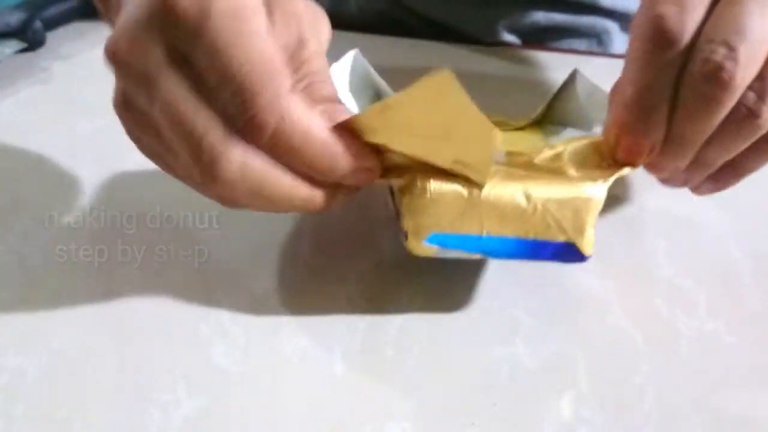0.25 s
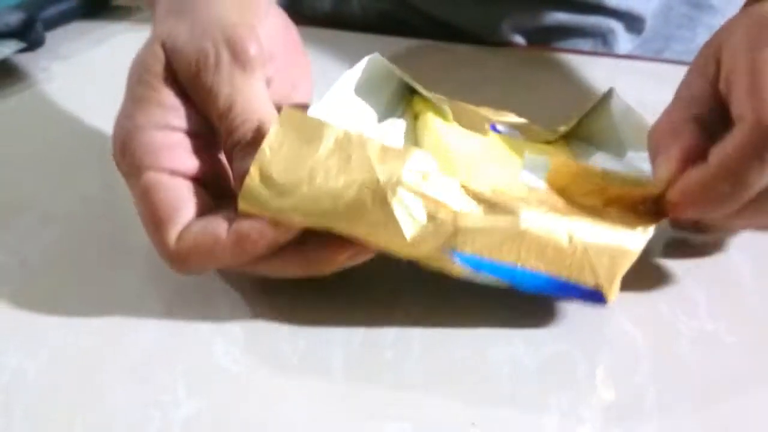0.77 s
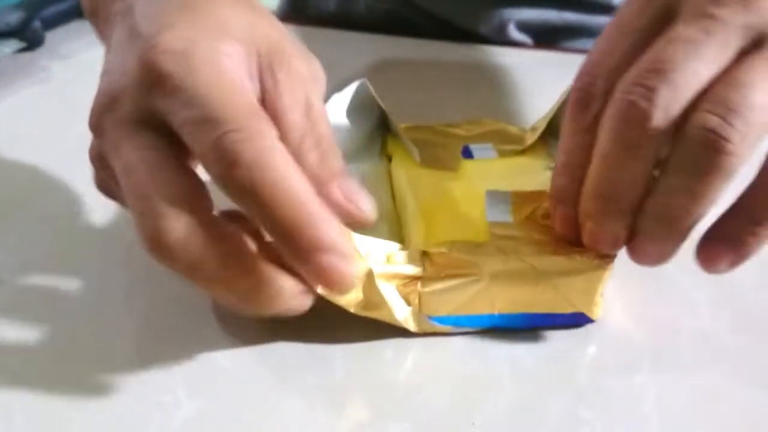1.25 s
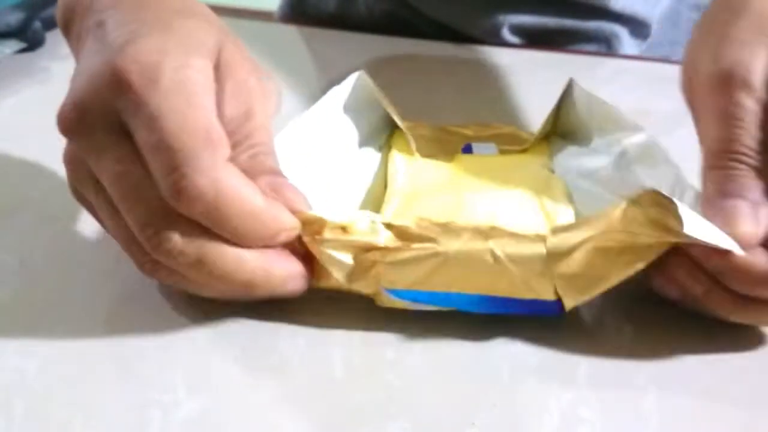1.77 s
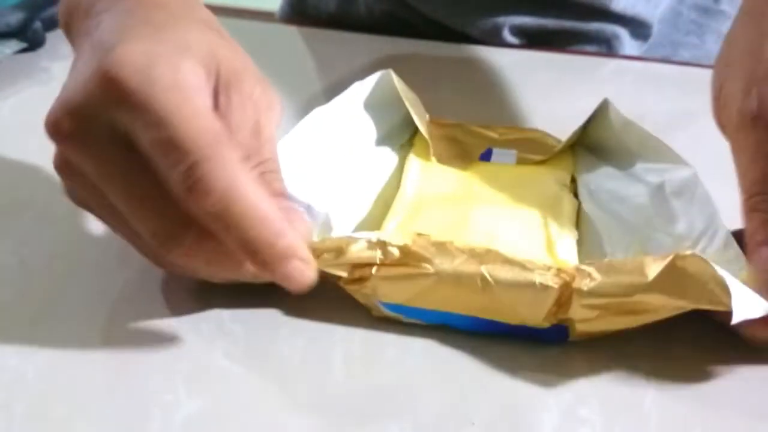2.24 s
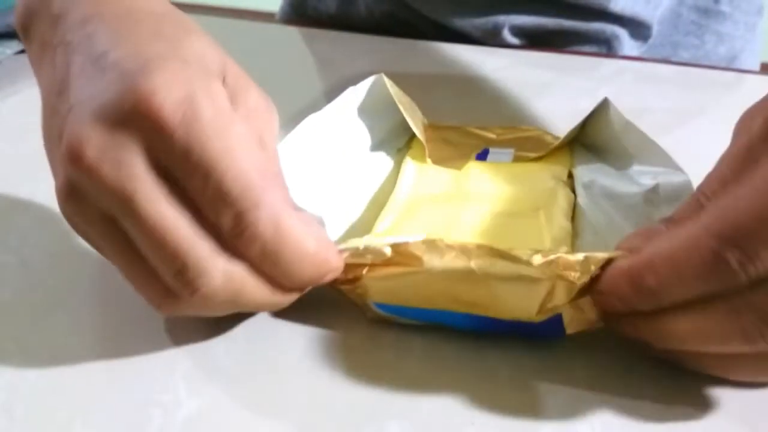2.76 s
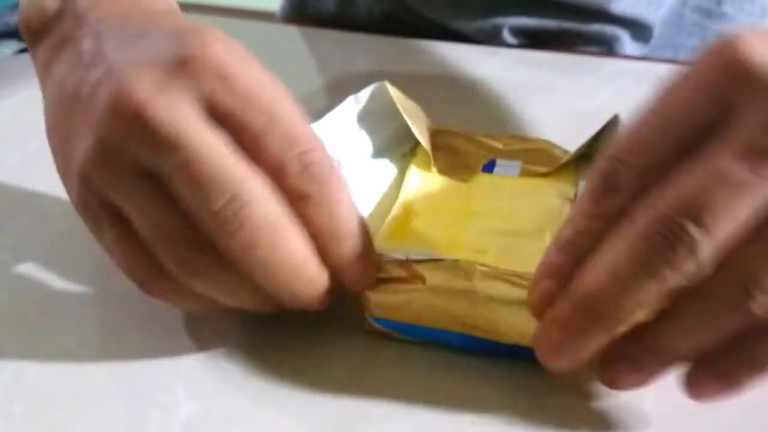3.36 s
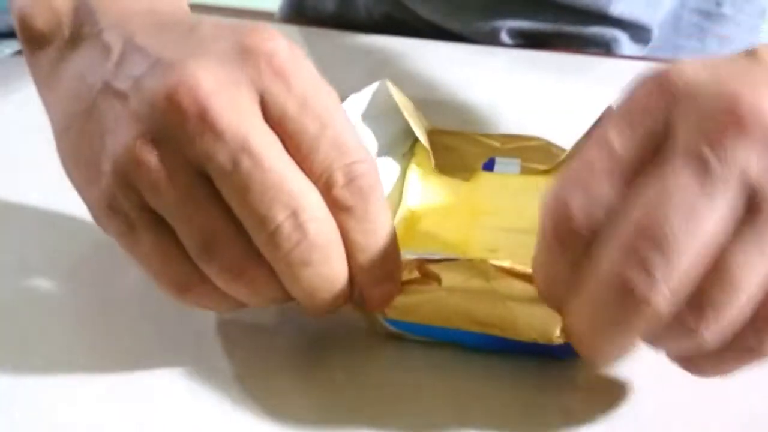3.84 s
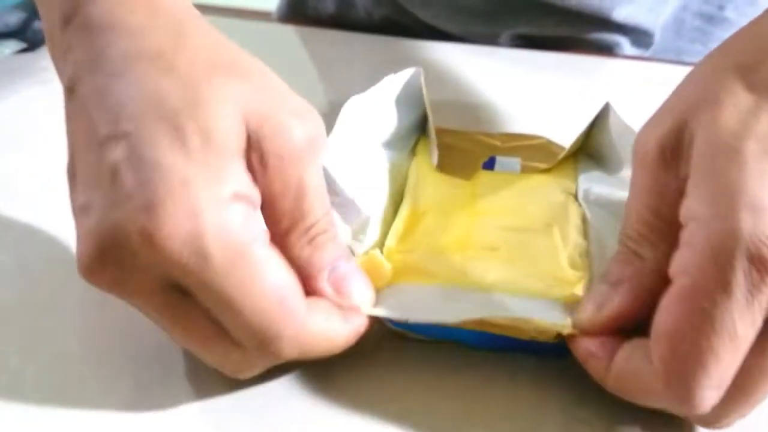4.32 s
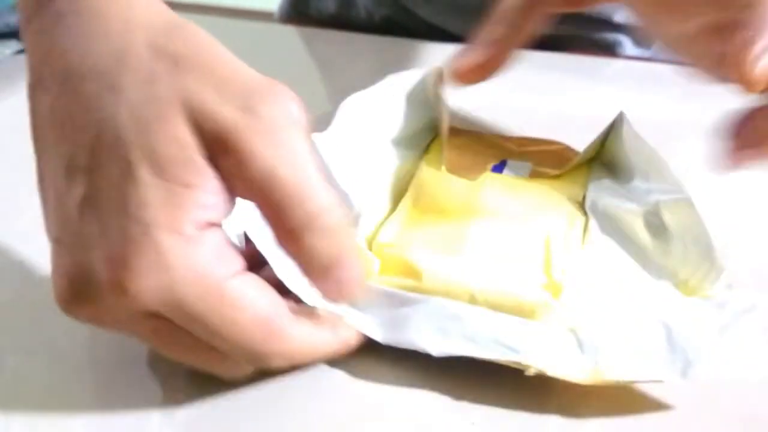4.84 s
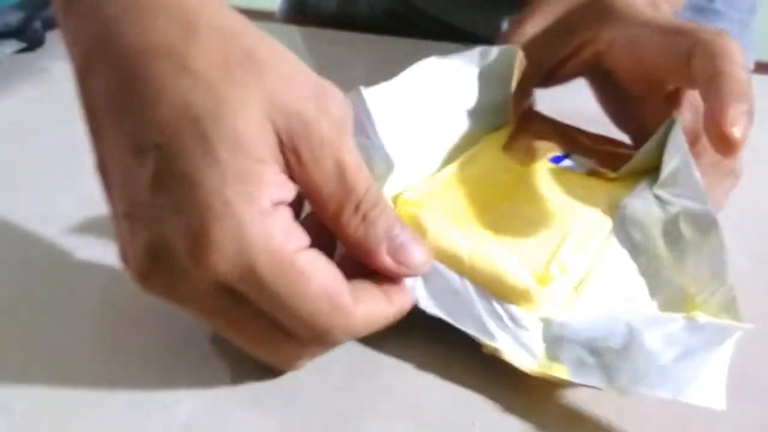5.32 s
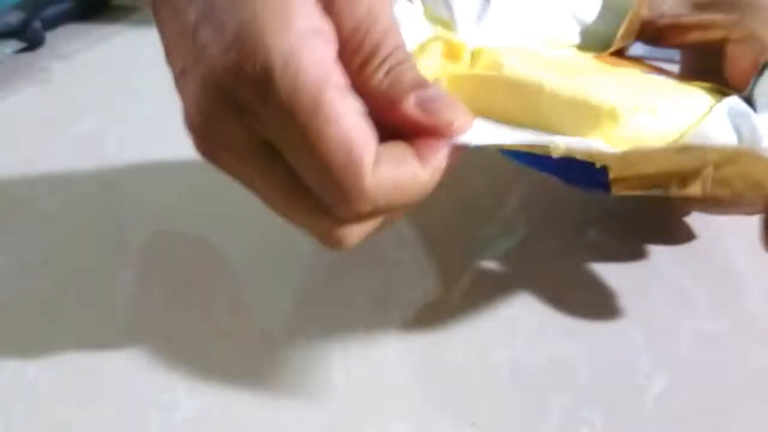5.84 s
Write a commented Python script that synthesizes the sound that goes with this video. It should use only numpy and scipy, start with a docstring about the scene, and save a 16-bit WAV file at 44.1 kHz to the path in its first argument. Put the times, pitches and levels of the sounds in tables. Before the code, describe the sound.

Crisp foil paper crinkles and snaps unevenly as fingers open it, with soft low thuds on the worktop and busier rustling at the end.

```python
"""On a kitchen worktop, close to a phone, fingers unfold a foil-lined paper wrapper round a soft block.
A fine rustle is made of thousands of tiny random creases; larger creases snap as bursts of jolts that
ring the sheet, the loudest, near 1.59 s, built of two overlapping bursts. The hard-walled kitchen echoes
the wrapper through decaying bands of noise. Block and hands thud on the worktop, which booms as a bank of
damped sines. Underneath lie a wavering rumble, a faint filtered hiss and a distant engine of sine orders."""
import sys
import numpy as np
from scipy import signal
from scipy.fft import rfft, irfft, next_fast_len
from scipy.io import wavfile
from scipy.ndimage import uniform_filter1d

SR = 44100
rng = np.random.default_rng(int(sys.argv[2]) if len(sys.argv) > 2 else 0)


def digitize_waveform(pressure):
    """Quantize a signal to 16-bit integers and store it at the path in sys.argv[1].

    Rows of a 2-D input are taken as channels; values are limited to [-1, 1].
    """
    field = np.atleast_2d(pressure).T
    bounded = np.clip(field, -1, 1)
    quanta = np.round(bounded * 32767).astype(np.int16)
    wavfile.write(sys.argv[1], SR, quanta)


N = 268569
T = np.arange(N) / SR

# The sheet never quite rests. Each row: time in seconds, level in dB before the rustle trim.
RESTING_RUSTLE = [(0, -48.5), (.35, -52), (.65, -46), (.9, -56.5), (1.45, -45.5), (2.0, -56), (2.35, -57.5),
                  (2.56, -68), (2.68, -59.5), (3.05, -64), (3.2, -71), (3.6, -55), (4.9, -61), (5.4, -57.5),
                  (6.09, -54.5)]
# Swells of the rustle, from a pull on the sheet or, at 1.615 s, the ringing tail of the big snap.
# Each row: peak time in seconds, level in dB before the rustle trim, rise in ms, fall in ms,
# dull share in dB, its tilt in dB per octave, airy share in dB.
SWELLS = [(.405, -45, 14, 31, 7.5, -6, -14), (.686, -63, 8, 20, -8, 3, -25),
          (1.01, -51.5, 7.9, 45, -3, -7, -5), (1.075, -45.5, 65, 34, -6, -7.5, -3),
          (1.199, -58, 19, 22, 8, -8, -3), (1.615, -52, 28, 110, 5.5, 22, -10),
          (1.88, -48.5, 23, 120, -1, -5.5, -22), (2.25, -48, 4.9, 36, -10, -12, -10),
          (2.459, -51, 53, 32, -3, -2, -5), (2.758, -54, 11.6, 37, -18, 6, -22),
          (2.905, -60, 14, 85, -8, -6, -8), (3.369, -50, 8.8, 58, -0.5, -1.5, -11),
          (3.608, -50.5, 32, 12, 6.5, 8, -17), (4.263, -47.5, 64, 18, -1.5, 2, -6),
          (4.549, -43.5, 28, 16, -12.5, 21, -15), (4.701, -44.5, 80, 32, -6.5, 2, -13),
          (4.86, -51, 7.2, 51, -3, 2, -8), (4.961, -36.5, 1.9, 15, 4.5, -7, -25),
          (4.983, -22.5, 7.9, 3.5, -29, 6, -41), (5.195, -39.5, 7.8, 31, -15.5, -10, -14),
          (5.279, -39, 23, 29, -14, -2, -14), (5.36, -46.5, 24, 20, -16, 8, -12),
          (5.471, -42.5, 8.1, 17, -27, 4, -15), (5.585, -46.5, 19, 18, -1.5, 11, -8),
          (5.688, -44, 15, 17, -17, 4, -13), (5.981, -42, 43, 48, 0.5, -0.5, -12),
          (6.07, -46, 48, 65, -5, 0, -10)]
# Crisp resonances of the foil. Each row: centre in Hz, width in Hz (widened for the rustle), level in dB.
FOIL = [(3170, 630, -1), (4334, 620, 3.5), (5546, 680, 7.5), (6320, 2540, -4)]
# Broad facets that give the duller part. Each row: centre in Hz, width in Hz before widening, level in dB.
FACETS = [(1033, 690, -4), (1800, 1700, -7.5), (2640, 800, 2.5), (3360, 1300, -8)]
DULL_SHARE_DB, AIR_SHARE_DB = -1.5, -11.5  # duller part and airy top of the resting rustle
RUSTLE_TRIM_DB = -5.5

# Low rumble. Each row: time in seconds, level in dB.
RUMBLE = [(0, -60), (1.3, -60), (1.8, -64), (2.5, -62), (2.9, -67), (5.35, -66), (5.6, -70), (6.09, -70)]
# Colour of the hiss. Each row: frequency in Hz, relative level in dB per Hz.
HISS_COLOUR = [(59, -41), (100, 5.5), (251, -26), (324, -8.5), (564, -17), (761, -10.5), (884, -14),
               (1330, -13), (2460, -10.5), (5430, -16), (9070, -24.5), (14800, -24.5), (16500, -48)]
HISS_DB = -61

# A distant engine drones past. Each row: time in seconds, cycle rate in Hz, level in dB before its trim.
ENGINE = [(0, 27.85, -83), (0.597, 35.3, -63.5), (1.65, 39.77, -62.5), (1.85, 39.04, -76),
          (3.199, 31.94, -72), (3.502, 35.33, -68), (4.102, 41.09, -68), (4.5, 41.73, -68),
          (4.801, 40, -67.5), (4.999, 39.7, -82), (6.09, 37, -94)]
# Engine orders. Each row: multiple of the cycle rate, level in dB.
ENGINE_ORDERS = [(2, 0), (3, -13), (4, -10), (5, -8), (10, -14)]
ENGINE_TRIM_DB = 5

# Creases that snap; 0.018 s and 1.594 s are early reflections of the snap just before, and 1.5896 s
# and 1.5909 s together make the loudest snap. Each row: time in seconds, crisp peak in dB before the
# snap trim, panel peak in dB over the crisp one, panel pitch in Hz, fine edge peak in dB over the
# crisp one, crumple time in ms (shortened by CRUMPLE_OFFSET_MS).
SNAPS = [(0.0117, -10.5, -16, 1590, -20, 1.07), (0.018, -24, 0.5, 2090, -6.5, 2),
         (0.0421, -31.5, -5, 1920, -8.5, 2.5), (.245, -40, -1, 2020, -21, 3),
         (0.3605, -33.5, -28, 2440, -6, 1.9), (0.3697, -35, 1.5, 930, 0.5, 1.9),
         (0.383, -53, 14, 1300, -8, 3.1), (0.3969, -22, -2.5, 1350, -26, 1.55),
         (0.5, -33.5, -30, 1410, -9, 0.74), (0.5649, -24, -30, 2550, -10, 0.55),
         (0.591, -30, -13, 4000, -23, 1.8), (.619, -37, -22, 2500, 1, 1.4),
         (0.6261, -31, -4, 2570, -28, 1.8), (0.684, -34, -4, 2720, -15, 6.6),
         (0.7218, -35.5, -15, 1360, -18, 1), (0.776, -46, 3, 2830, -17, 1.4),
         (1.058, -43, -2, 1110, -32, 2.8), (1.342, -38, -10, 2300, -2, 3.5),
         (1.4327, -52, -6, 2378, 15.5, 5.5), (1.5596, -39, 16.5, 1950, -12, 0.65),
         (1.5716, -37, 6, 1180, -16, 1.2), (1.5774, -18.5, -0.5, 2220, -37, 1.4),
         (1.585, -19.5, 1.5, 2090, -34, 1.4), (1.5896, -5, -0.5, 2320, -18, 0.92),
         (1.5909, -23.5, 12.5, 3700, -26, 2.3), (1.594, -23, -1, 2420, -15, 1.2),
         (1.606, -28, 9, 3100, -15, 1.4), (1.643, -42, -4, 3300, -20, 1.2),
         (1.6802, -36, 11.5, 1450, -15, 1.4), (1.7486, -29.5, 12, 1930, -36, .6),
         (1.752, -18, -6, 1830, 0, 0.96), (1.81, -30.5, -17, 2014, -24, 0.85),
         (1.87, -25, -7.5, 2200, -8, 3.5), (1.965, -32.5, -24, 2390, -6, 3.7),
         (2.0246, -41, -2, 2600, -19, 0.78), (2.043, -45, -3, 597, 3, 2.9),
         (2.165, -36, -30, 1736, -4, 1.5), (2.904, -41.5, -0.5, 2404, -1, 3),
         (3.0236, -42.5, -23, 2453, -22, 0.92), (3.241, -44.5, -4, 1960, -3, 1.8),
         (3.3114, -39.5, -7, 1740, -14, 1.7), (3.4621, -36, -3.5, 1640, -8, 4.5),
         (3.5148, -26.5, -20, 2500, -12, 1.2), (3.701, -51, 5, 2270, -12, 1.5),
         (3.847, -39, -20, 2160, -15, 2), (3.856, -46.5, 7, 2600, -8, 1.4),
         (3.8913, -33.5, -11, 2165, -25, 0.73), (3.928, -46.5, 13, 2870, -3, 3.1),
         (3.987, -40.5, -10, 4000, -25, 1.5), (4.019, -25.5, -37, 2270, -36, 0.65),
         (4.069, -40, -24, 2620, -1.5, 1.8), (4.1902, -37.5, -5, 2232, -34, 0.88),
         (4.2196, -43, -1, 1765, -7, 1.1), (4.228, -36, -15, 2504, -3, 1.6),
         (4.2432, -41, 1, 2000, -15, 0.93), (4.264, -39, -5, 2500, -6, 1.5),
         (4.2696, -31.5, 0.5, 2180, -5.5, 1.8), (4.4231, -38, -4, 1980, -10, 1.1),
         (4.4457, -43.5, 0.5, 2520, -1, 2.7), (4.516, -42, -3, 3300, -20, 1),
         (4.566, -31, -5.5, 2600, -4, 1.36), (4.62, -42, -3.5, 1010, -12, 2.6),
         (4.654, -35, -8, 2800, -17, 2.5), (4.677, -37.5, 2, 3200, -15, 0.6),
         (4.702, -38.5, -21, 3500, -16, 6.2), (4.715, -41.5, 1.5, 2780, -9, 2),
         (4.848, -28.5, -32, 2740, -6, 1.76), (4.8914, -25.5, -7.5, 2720, -4.5, 2.4),
         (4.9561, -30, -6.5, 1320, -20, 3.3), (4.974, -18, -14.5, 1390, -28, 3.7),
         (4.981, -17.5, -13, 3200, -25, 2.9), (4.9845, -22, -27, 2800, -14, 1.1),
         (5.0978, -32, -4.5, 1795, -8, 2.7), (5.182, -31, -16, 1560, -14, 4.9),
         (5.199, -33, -18, 2500, -20, 2.2), (5.2599, -36, -4, 1520, -7, 0.66),
         (5.2915, -33, -22, 3000, -20, 0.9), (5.318, -35.5, -36, 2520, -2, 5.1),
         (5.4673, -27.5, -12.5, 1780, 1.5, 0.66), (5.4816, -35, -5, 2320, -16, 0.7),
         (5.555, -38, -14, 2400, -1, 1.4), (5.5638, -32, -13, 2750, -8.5, 0.75),
         (5.5714, -29.5, -0.5, 2480, -17, 1.3), (5.5883, -27.5, -13, 2110, -1.5, 1.9),
         (5.602, -31.5, -10, 2200, -11, 3.2), (5.723, -32, -23, 1960, -9, 0.67),
         (5.773, -30, -10, 2600, -11, 0.56), (5.797, -53, 4, 770, -14, 1.5),
         (5.8043, -28.5, -22, 2360, -12, 1.26), (5.872, -41, -20, 2490, -20, 1.1),
         (5.881, -34.5, -29, 2750, -20, 0.73), (5.9, -43, 5, 2400, -15, 1.9),
         (5.9155, -34.5, -5, 2580, -26, 1.2), (5.935, -44.5, 10.5, 2700, -13, 1.8),
         (5.97, -38, -11, 2500, 3, 1.9), (5.98, -37.5, 12, 2500, -15, 0.9),
         (5.983, -40.5, 16.5, 2440, 11.5, 1.7), (6.016, -38, -13, 3300, -20, 1),
         (6.031, -33.5, -17, 2080, 9, 1.5), (6.0387, -28.5, 3, 2930, -1, 0.62),
         (6.048, -52, 12, 785, -11, 2.4), (6.0747, -29.5, -9, 2150, -19, 2.4),
         (6.08, -30, -18, 2500, -14, 0.77)]
# Fine edge of a snap. Each row: centre in Hz, width in Hz, level in dB.
EDGE = [(7950, 6200, 2.5), (14770, 1200, 10)]
# Side on which the fingers work. Each row: time in seconds, left minus right in dB.
HANDS = [(0, 3), (.65, 6), (1.1, 17), (1.6, -2), (3.3, 2.5), (4.0, -1.5), (4.5, 4), (4.9, 2), (6.09, 1.5)]
HANDS_SCATTER_DB = 3  # spread of single bursts round that side
CRISP_HZ, CRISP_SCATTER = 4700, 0.06  # pitch of the crisp part and its relative spread between bursts
CRUMPLE_OFFSET_MS = 0.7
BUILD_SHARE = 0.47  # time constant of the creak before the flip, as a share of the shortened crumple time
FLIP = 5  # size of the flip against the jolts round it
SNAP_TRIM_DB = 1.5

# Echo bands. Each row: centre in Hz, t60 in seconds, relative echo level in dB.
KITCHEN = [(434, 0.96, -20), (1400, 1, -35), (2240, 0.75, -26.5), (3060, 0.56, -16.5), (5550, 0.13, -19),
           (11800, 1, -14.5)]
ECHO_TRIM_DB = -29

# Thuds on the worktop. Each row: start in seconds, approximate peak in dB before the thud trim, left
# minus right in dB, contact in ms, damping by the hand as a factor, build-up in cycles, bass lift in dB.
THUDS = [(.911, -31.5, -6, 4.46, 1.13, 0.16, 8), (1.069, -24, -3, 2.32, 0.84, 1.6, 9),
         (2.272, -29, -4, 2.62, 0.85, 1.2, 7), (2.341, -49.5, -12, 1.1, 2.2, 0.43, 15),
         (3.319, -52.5, -7.5, 4.7, 0.58, 0.92, 4), (4.877, -47.5, -4, 4.9, 0.82, 0.77, -5),
         (5.247, -45.5, -11.5, 10, 2.3, 0.69, 0)]
# Worktop modes. Each row: frequency in Hz, level in dB, undamped t60 in seconds, right port lag in radians.
WORKTOP = [(54.4, -19, 0.9, 1.37), (77.7, -11.5, 0.49, 6.17), (106.5, -10.5, 0.46, 3.9),
           (151.5, 2.5, 0.23, 3.43), (207.5, -1, 0.35, 1.41), (299.4, -6.5, 0.35, 1.08),
           (374.7, -1.5, 0.32, 0.46), (434, -7.5, 0.54, 1.6), (526, -13, 0.59, 0.15),
           (590, 2.5, 0.25, 0.088), (692, 6.5, 0.088, 0.87), (916, 3, 0.25, 0.4)]
BLUR_SHARE = 0.085  # relative spread of the neighbours round each worktop mode
THUD_TRIM_DB = 1

# Colour of the two microphone ports. Each row: frequency in Hz, left minus right in dB.
PORTS = [(300, 6), (1200, -5), (2400, -0.5), (4400, 1.2), (8000, -5.5), (15000, 1.5)]
TOP_HZ = 16200  # upper limit of the phone


def undb(db):
    """Turn dB into a gain."""
    return 10 ** (np.asarray(db) / 20)


def unit(x):
    """Scale to an RMS of 1."""
    return x / np.sqrt(np.mean(x ** 2))


def sides(pan_db):
    """Gains of the left and right port, split evenly round the centre."""
    return undb(np.array([pan_db, -pan_db]) / 2)


def over_time(table):
    """Glide in straight lines through rows of time and value."""
    return np.interp(T, *np.transpose(table))


def peak(f, hz, width):
    """Response of a resonance, gain 1 at its centre."""
    return 1j * f * width / (hz ** 2 - f ** 2 + 1j * f * width)


def ring(f, modes):
    """Response of several resonances, summed with alternating sign."""
    return sum((-1) ** k * undb(db) * peak(f, hz, width) for k, (hz, width, db) in enumerate(modes))


def shape(x, response):
    """Filter along time by a response given as a function of Hz."""
    size = next_fast_len(x.shape[-1] + 4096)
    f = np.arange(size // 2 + 1) * SR / size + 1e-3
    return irfft(rfft(x, size) * response(f), size)[..., :x.shape[-1]]


def line(f, table):
    """Read dB off a curve drawn over log frequency."""
    hz, db = np.transpose(table)
    return np.interp(np.log(f), np.log(hz + 1), db)


def walk(rate):
    """Random levels held 1 / rate s and slewed twice; spread near 1."""
    hold = int(SR / rate)
    steps = np.repeat(rng.standard_normal(N // hold + 1), hold)
    slewed = uniform_filter1d(uniform_filter1d(steps, hold), hold)
    return unit(slewed[:N])


def pair(like, size):
    """Noise at the two ports, alike by the share given."""
    mid, side = rng.standard_normal((2, size))
    like = np.clip(like, 0, 1)
    return np.sqrt((1 + like) / 2) * mid + np.sqrt((1 - like) / 2) * side * np.array([[1], [-1]])


def creases(modes, colour):
    """Tiny creases, most faint; every resonance has its own creases and its own flurries."""
    out = []
    for hz, width, db in modes:
        struck = rng.random(N) < 450 / SR  # about 450 creases a second
        grains = struck * undb(4.0 * np.minimum(rng.exponential(size=N), 3.4))
        grains = np.sqrt(signal.lfilter([.06], [1, -.94], grains ** 2))  # each crease is a burst under 1 ms
        jolts = grains * pair(.6, size=N) + .16 * pair(.4, size=N)
        flurries = undb(db + 2.2 * walk(35))
        out.append(flurries * shape(jolts, lambda f: peak(f, hz, 1.88 * width) ** 2 * colour(f)))
    return np.array(out) / np.sqrt(np.mean(sum(out) ** 2))


def rustle():
    """Thousands of tiny creases a second, each ringing one resonance of the sheet, rise in swells."""
    crisp = undb(over_time(RESTING_RUSTLE))
    octaves = np.log2(np.array(FACETS)[:, :1] / 2200)  # place of each facet in the tilt
    dull = crisp * undb(DULL_SHARE_DB) + 0 * octaves  # one level curve per facet
    air = crisp * undb(AIR_SHARE_DB)
    for s, db, rise_ms, fall_ms, dull_db, tilt_db, air_db in SWELLS:
        age = (T - s) * 1000 / np.where(T < s, max(rise_ms, .5), max(fall_ms, 1))
        swell = undb(db) * np.exp(-np.abs(age) ** 1.3)
        crisp = crisp + swell
        dull = dull + undb(dull_db + tilt_db * octaves) * swell
        air = air + undb(air_db) * swell
    airy_modes = ((8900, 4600, 0.5), (12600, 10000, 0.54))  # Hz, width in Hz before widening, dB
    sheet = crisp * creases(FOIL, lambda f: peak(f, 3800, 2740)).sum(0)
    sheet = sheet + (dull[:, None] * creases(FACETS, lambda f: peak(f, 1770, 5100))).sum(0)
    sheet = sheet + air * creases(airy_modes, lambda f: peak(f, 15800, 10400)).sum(0)
    return sheet * undb(RUSTLE_TRIM_DB + 1.7 * walk(60))


def rumble():
    """Noise through narrow low resonances wavers near 70 Hz, louder at the right port."""
    low = shape(pair(1.0, size=N), lambda f: peak(f, 72.0, 41) ** 2 + undb(-8.5) * peak(f, 122.0, 143) ** 2)
    return unit(low) * undb(over_time(RUMBLE)) * sides(-2.5)[:, None]


def hiss():
    """Steady coloured noise, almost unrelated at the two ports."""
    noise = shape(pair(0.081, size=N), lambda f: undb(line(f, HISS_COLOUR)))
    return unit(noise) * undb(HISS_DB)


def engine():
    """A few orders of the cycle rate, each wavering in level at random."""
    s, *columns = np.transpose(ENGINE)
    hz, db = (np.interp(T, s, column) for column in columns)
    turn = 2 * np.pi * np.cumsum(hz * (1 + 0.00623 * walk(22.82))) / SR
    lag = 0.46 * np.array([[0], [1]])  # radians per order at the left and right port
    drone = 0
    for order, order_db in ENGINE_ORDERS:
        drone = drone + undb(order_db + 3.2 * walk(8)) * np.sin(order * (turn - lag))
    return drone * undb(db + ENGINE_TRIM_DB) * sides(-6.5)[:, None]


def snaps():
    """Bursts of tiny jolts, as a crease flips, ring the foil and the flat panel next to it."""
    size, lead = 2048, 256  # samples in a burst, and before its centre
    out, t = np.zeros((2, N + size)), np.arange(size) / SR
    scatter = rng.standard_normal((len(SNAPS), 2))
    for (s, db, panel_db, panel_hz, edge_db, ms), (pitch, side) in zip(SNAPS, scatter):
        crisp_hz = CRISP_HZ * (1 + CRISP_SCATTER * pitch)
        pan_db = np.interp(s, *np.transpose(HANDS)) + HANDS_SCATTER_DB * side
        age = (t - t[lead]) / (max(ms - CRUMPLE_OFFSET_MS, .1) / 1000)
        envelope = np.exp(np.where(age < 0, age / BUILD_SHARE, -np.abs(age) ** .5))
        jolt = pair(0.94, size=size) * envelope
        jolt[:, lead + 6] -= FLIP  # the flip itself, one sharp step
        crisp = shape(jolt, lambda f: ring(f, FOIL) * peak(f, crisp_hz, 4300) ** 2)
        panel = shape(jolt, lambda f: peak(f, panel_hz, 0.98 * panel_hz) ** 2)
        edge = shape(jolt, lambda f: ring(f, EDGE) * peak(f, 7300, 3400))
        parts = ((0, crisp), (panel_db, panel), (edge_db, edge))
        snap = sum(undb(part_db) * part / abs(part).max() for part_db, part in parts)
        k = int(s * SR) - lead
        out[:, k:k + size] += undb(db + SNAP_TRIM_DB) * sides(pan_db)[:, None] * snap
    return out[:, :N]


def kitchen(x):
    """Diffuse echo, each band with its own decay, unrelated at the two ports."""
    t, tail = np.arange(SR) / SR, 0
    for hz, t60, db in KITCHEN:
        band = unit(shape(rng.standard_normal((2, SR)), lambda f: peak(f, hz, 1.11 * hz) ** 2))
        tail = tail + undb(db + ECHO_TRIM_DB) * band * np.exp(-np.log(1000) * t / t60)
    tail = tail * (1 - np.exp(-(t / 0.0014) ** 2))  # the echo fades in over the first few ms
    return signal.fftconvolve(x.mean(0)[None], tail)[:, :N]


def thuds():
    """A soft push sets the worktop booming; its slow bending waves reach the ports out of step."""
    out, t = np.zeros((2, N + SR)), np.arange(SR) / SR
    for s, db, pan_db, ms, damp, cycles, bass_db in THUDS:
        boom = 0
        for hz, mode_db, t60, lag in WORKTOP:
            soft = 1 / (1 + (hz * ms / 1000) ** 4)  # a longer contact feeds the high modes less
            swell = 1 - np.exp(-t * hz / max(cycles, .1))  # each mode builds up over its own cycles
            decay = np.exp(-np.log(1000) * t * damp / t60)
            turn = 2 * np.pi * hz * t
            tone = np.sin(turn - lag * np.array([[0], [1]]))
            for apart, left, right in rng.standard_normal((8, 3)):  # close neighbours blur the pitch
                phase = lag * np.array([[left], [right]])
                tone = tone + 0.81 * np.sin(turn * (1 + BLUR_SHARE * apart) + phase)
            level = undb(mode_db + bass_db / (1 + (hz / 100) ** 4))  # the bass lift fades out above 100 Hz
            boom = boom + level * soft * swell * decay * tone
        k = int(s * SR)
        strength = 3.94 * np.sqrt(np.mean(boom.mean(0)[:SR // 12] ** 2))  # near the peak of the first 80 ms
        out[:, k:k + SR] += undb(db + THUD_TRIM_DB) * sides(pan_db)[:, None] * boom / strength
    return out[:, :N]


def ports(x):
    """The two ports colour the wrapper differently; the left one leads, less in the treble."""
    def lead(f):
        return np.exp(2j * np.pi * f * 6e-5 / (1 + (f / 8000) ** 2))
    left = shape(x[0], lambda f: undb(line(f, PORTS) / 2) * lead(f))
    right = shape(x[1], lambda f: undb(-line(f, PORTS) / 2))
    return np.array([left, right])


def scene():
    """The wrapper with its echo, over thuds, engine, rumble and hiss."""
    clicks, sheet = snaps(), rustle()
    wrapper = ports(clicks + sheet + kitchen(clicks + .5 * sheet))
    return wrapper + thuds() + engine() + rumble() + hiss()


def record(dry):
    """The phone rounds the loudest peaks and cuts the top."""
    soft = 1.1 * np.tanh(dry / 1.1)
    return signal.sosfilt(signal.ellip(10, .2, 80, TOP_HZ, fs=SR, output="sos"), soft)


dry = scene()
out = record(dry)
digitize_waveform(out)
```